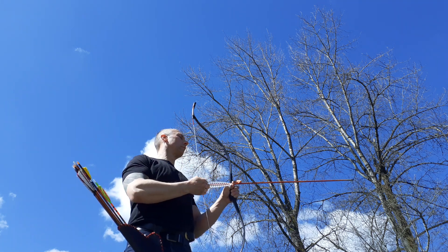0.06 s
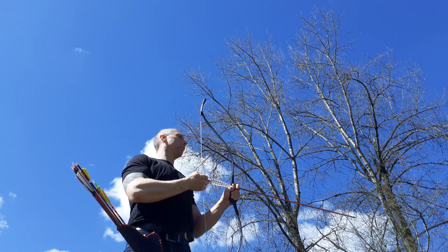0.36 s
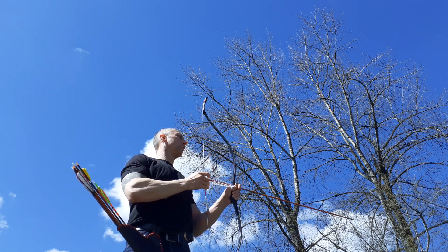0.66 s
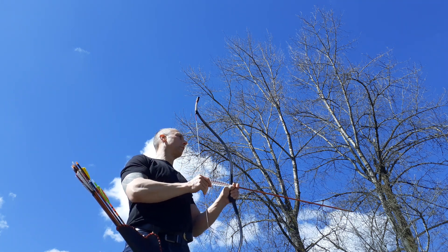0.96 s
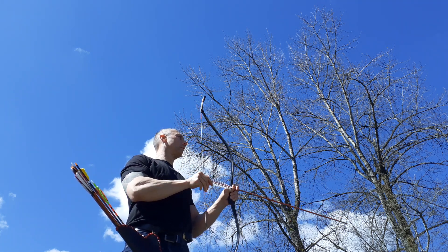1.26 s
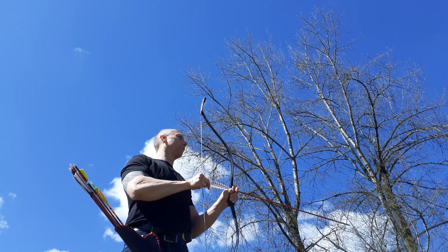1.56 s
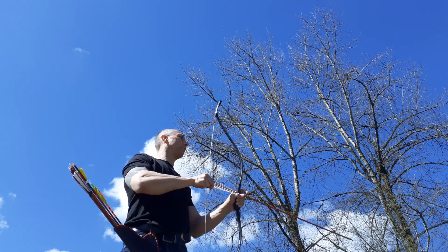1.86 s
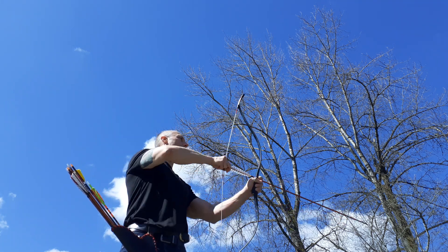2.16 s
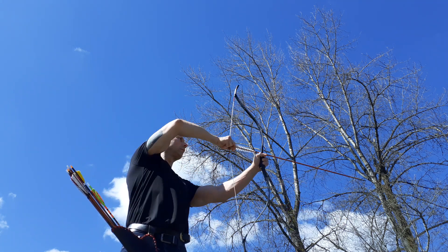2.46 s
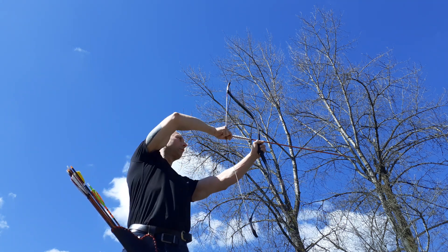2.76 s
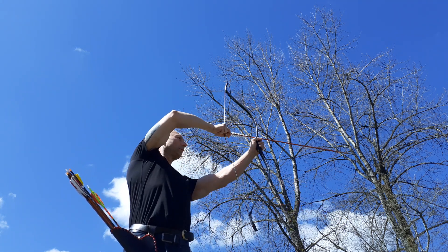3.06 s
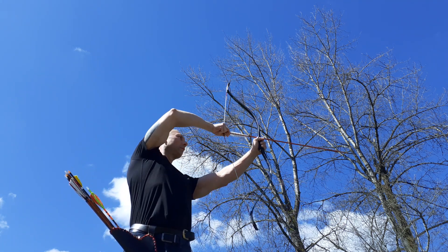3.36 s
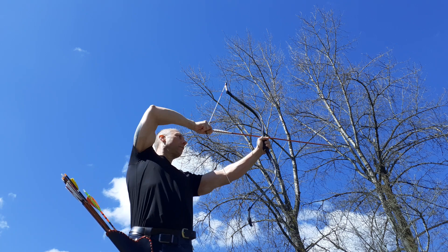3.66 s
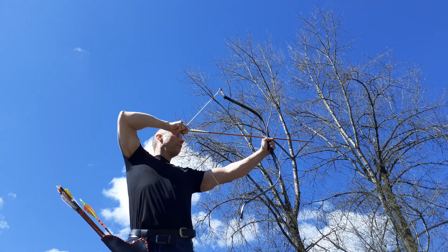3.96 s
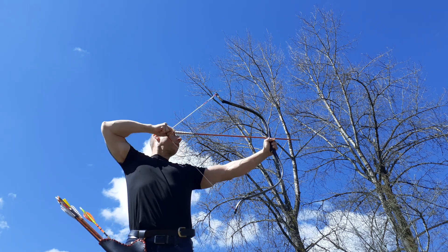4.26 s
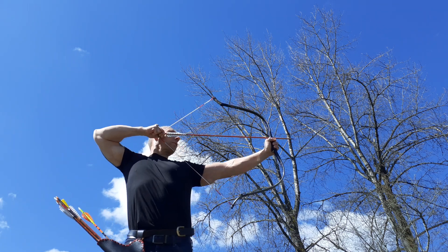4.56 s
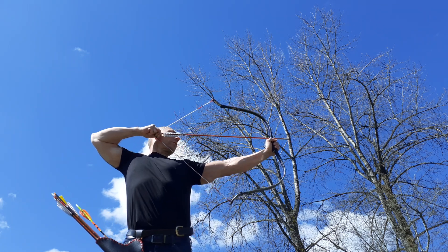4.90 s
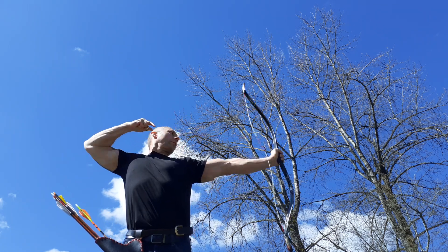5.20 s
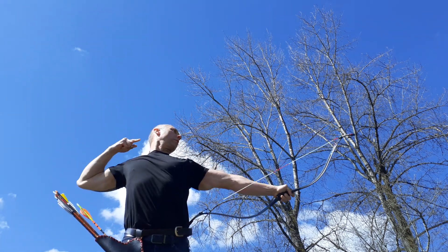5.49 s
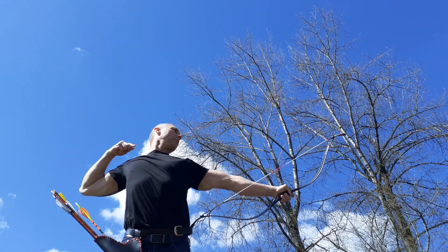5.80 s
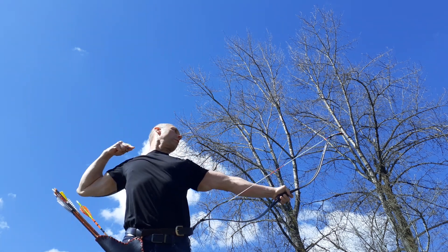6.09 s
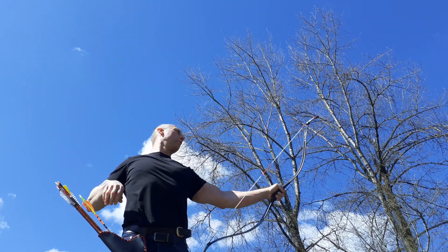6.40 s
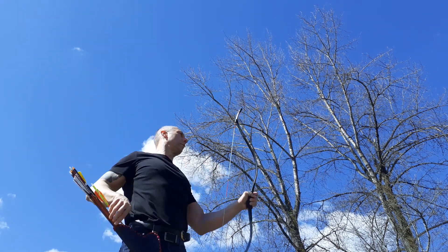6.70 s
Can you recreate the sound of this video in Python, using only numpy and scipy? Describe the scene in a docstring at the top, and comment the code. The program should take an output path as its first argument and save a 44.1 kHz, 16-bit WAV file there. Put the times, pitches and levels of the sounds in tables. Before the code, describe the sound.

A bow creaks as it is drawn, then fires with a sharp string snap over distant traffic rumble and a faint bird.

```python
"""Distant traffic rumbles, and a small bird whistles six notes over it. An archer nocks an arrow with light
clicks and draws his bow, which creaks by stick-slip friction. He shoots: the string slaps home and excites
the bow's modes, the shaft clatters past, and ground and trees scatter the snap. The arrow lands far off
with a tick, and feathers rub as his hand goes to the quiver. The traffic carries on throughout."""
import sys
import numpy as np
from scipy import signal
from scipy.fft import rfft, irfft, next_fast_len
from scipy.io import wavfile
from scipy.ndimage import map_coordinates

SR = 44100
rng = np.random.default_rng(int(sys.argv[2]) if len(sys.argv) > 2 else 0)


def unload_audio(sound):
    """Save the sound as a 16-bit wav file, at the path given as the first command line argument."""
    columns = np.transpose(np.atleast_2d(sound))
    # keep every value between -1 and 1, then stretch to whole-number steps
    steps = np.round(np.clip(columns, -1, 1) * 32767)
    wavfile.write(sys.argv[1], SR, steps.astype(np.int16))


N = 301644

# Friction spectrum of feathers. Each row: frequency in Hz, relative level in dB.
FEATHER_SPECTRUM = [(2000, -25), (4500, -11), (5800, 2.5), (7400, 5.5), (10500, -6), (13500, -3.5),
                    (16000, -17)]


def amp(db):
    """Amplitude ratio of a level in decibels."""
    return 10 ** (np.asarray(db) / 20)


def unit(x):
    """Normalisation to an rms of 1."""
    return x / np.sqrt(np.mean(x ** 2) + 1e-20)


def along(points, hz):
    """Interpolation of (Hz, value) points on a logarithmic frequency axis."""
    f, v = np.transpose(points)
    return np.interp(np.log(hz + 1), np.log(f + 1), v)


def curves(rows):
    """Linear interpolation in time: one value per sample for each column after the first."""
    s, *columns = np.transpose(rows)
    return [np.interp(np.arange(N) / SR, s, column) for column in columns]


def wobble(rate):
    """Smooth random modulation with `rate` knots a second."""
    knots = rng.standard_normal(int(N * rate / SR) + 4)
    return map_coordinates(knots, [np.arange(N) * rate / SR])


def arch(s, length):
    """A rounded envelope from 0 to 1 and back."""
    u = np.clip((np.arange(N) / SR - s) / length, 0, 1)
    return np.sqrt(np.abs(np.sin(np.pi * u)))


def filtered(x, response):
    """Linear filtering: the spectrum is multiplied by a complex frequency response."""
    n = x.shape[-1]
    m = next_fast_len(n + 8192)
    return irfft(rfft(x, m) * response(np.fft.rfftfreq(m, 1 / SR)), m)[..., :n]


def add(track, s, sound):
    """Superposition of a sound on a track from time s."""
    part = track[max(round(s * SR), 0):][:len(sound)]
    part += sound[:len(part)]


def panned(x, balance):
    """A level difference between left and right that depends on frequency."""
    return filtered(x, lambda hz: amp(np.outer([.5, -.5], along(balance, hz))))


def tilted(size, spectrum, tilt_db, pivot_hz):
    """Coloured noise of rms 1, tilted by tilt_db per octave above a pivot."""
    colour = lambda hz: amp(along(spectrum, hz) + tilt_db * np.log2(np.maximum(hz / pivot_hz, 1)))
    return unit(filtered(rng.standard_normal(size), colour))


def diffuse_noise(spectrum):
    """Partial coherence: left and right are alike in the bass and only weakly related in the treble."""
    # Each row: frequency in Hz, left-right correlation.
    coherence = [(60, 0.92), (150, 0.98), (300, 0.85), (640, .4), (1000, 0.028), (1400, -0.55),
                 (3000, 0.28), (7000, -0.13)]
    angle = lambda hz: np.arccos(np.clip(along(coherence, hz), -1, 1)) / 2
    response = lambda hz: amp(along(spectrum, hz)) * [np.cos(angle(hz)), np.sin(angle(hz))]
    mid, side = filtered(rng.standard_normal((2, N)), response)
    return unit(np.array([mid + side, mid - side]))


def engine_note(hz, waver, flutter_db):
    """A far engine's firing tone, modulated in frequency and amplitude on the way."""
    phase = 2 * np.pi * np.cumsum(hz * (1 + waver * wobble(14))) / SR
    return amp(flutter_db * wobble(9)) * unit(np.sin(phase))


def engines():
    """Pitch follows firing rate: one engine is heard throughout, others glide by briefly."""
    # An engine pulls, eases off and pulls again. Each row: time in seconds, pitch in Hz, relative dB.
    lasting_engine = [(.8, 192, -56), (1.3, 180, -48), (2.2, 207, -46.5), (2.8, 181, -40.5),
                      (3.6, 192, -48), (4.2, 185, -46), (5.1, 200, -42), (5.7, 210, -47), (6.84, 222, -46)]
    # Each row: start and length in seconds, first and last pitch in Hz, relative level in dB.
    brief_engines = [(-.3, .9, 114, 148, -41.5), (-.3, 1.3, 71, 77, -37.5), (-.1, 1.6, 335, 310, -50),
                     (.1, 1.35, 103, 106, -40.5), (1.6, .65, 69, 81, -40), (4.8, .5, 97, 99, -40.5),
                     (5.7, .7, 103, 105, -40), (5.9, 1.6, 160, 170, -42), (5.9, 1.1, 131, 142, -46)]
    hz, db = curves(lasting_engine)
    track = amp(db - 1.5) * engine_note(hz, waver=.012, flutter_db=2.5)
    for s, length, first_hz, last_hz, level_db in brief_engines:
        glide, = curves([(s, first_hz), (s + length, last_hz)])
        track += amp(level_db - 1) * arch(s, length) * engine_note(glide, waver=.009, flutter_db=1.5)
    return track


def traffic():
    """Incoherent sources add: a slowly receding rumble, tyre roar, faint hiss and engine tones."""
    # Each row: time in seconds, relative levels of tyre roar and of hiss in dB.
    levels = [(0, -49, -82.5), (.7, -48.7, -82.5), (2.7, -47, -79.3), (4.6, -47.5, -77.5),
              (5.4, -47.7, -76.5), (6.1, -48, -81), (6.84, -47.5, -77)]
    # Three noise spectra. Each row: frequency in Hz, relative spectral density in dB.
    rumble_spectrum = [(13, -58), (22, -35), (37, -27), (62, -9), (92, 1.5), (150, -6), (193, -7.5),
                       (258, -11), (319, -8), (374, -14), (520, -25), (680, -45), (1140, -120)]
    roar_spectrum = [(150, -37), (420, -4), (600, -1), (800, 0.5), (1120, 0.5), (1300, -8.5), (1700, -6.5),
                     (2500, -12), (3300, -25.5), (4200, -27.5), (5200, -42.5), (9000, -57)]
    hiss_spectrum = [(2000, -32), (4000, 1), (5400, -3), (6900, -0.5), (8500, -5), (10500, -11),
                     (16000, -9.5)]
    # Each row: frequency in Hz, left minus right in dB.
    balance = [(60, -2.5), (380, -2.5), (700, -1), (1100, 3.5), (1500, -1.5), (2400, -1.5), (3800, 1.5),
               (5000, -3), (15000, -2.5)]
    rumble_db, fade_db_per_s = -35.3, .25
    roar_db, hiss_db = curves(levels)
    t = np.arange(N) / SR
    rumble = amp(rumble_db - fade_db_per_s * t + .8 * wobble(7)) * diffuse_noise(rumble_spectrum)
    roar = amp(roar_db + 1.5 + .56 * wobble(5.4)) * diffuse_noise(roar_spectrum)
    hiss = amp(hiss_db + 4.5) * diffuse_noise(hiss_spectrum)
    return panned(rumble + roar + hiss + engines(), balance)


def bird(first_s, spacing_s, note_s, dip_hz, sweep_hz, waver_hz, count):
    """Frequency-modulated whistles: each dips and rises with a quaver, loudest just after the dip."""
    track, u = np.zeros(N), np.linspace(-1, 1, int(note_s * SR))
    swell = np.cos(np.pi * u / 2) * (1 + u / 2)
    for k in range(count):
        db = -65 + .7 * k + rng.normal(0, 1)  # the phrase grows a little louder
        quaver = unit(filtered(rng.standard_normal(len(u)), lambda f: f < 300))
        pitch = dip_hz + rng.normal(0, 35) + sweep_hz * np.sin(np.pi * u / 2) ** 2 + waver_hz * quaver
        note = amp(db) * swell * np.sin(2 * np.pi * np.cumsum(pitch) / SR)
        add(track, first_s + spacing_s * k - note_s / 2, note)
    return track


def scatter(x, decay, onset_s):
    """Diffuse scattering: an echo builds up, then each frequency dies at its own rate."""
    hz, t, noise = signal.stft(rng.standard_normal((2, SR)), SR, nperseg=256)
    envelope = amp(-60 * t / along(decay, hz)[:, None]) * (1 - np.exp(-(t / onset_s) ** 2))
    tail = signal.istft(noise * envelope, SR, nperseg=256)[1]
    return signal.fftconvolve(x[None], tail / np.linalg.norm(tail[0]), axes=1)[:, :N]


def rustle(grit_db):
    """Light friction: fingers and feathers brush the arrow in tiny uneven grains."""
    # Each row: start and length in seconds, level in dB, treble tilt in dB per octave.
    strokes = [(-.5, 2.6, -83, 16), (3.55, .55, -73.5, -14)]
    brush = sum(amp(db) * arch(s, length) * tilted(N, FEATHER_SPECTRUM, tilt_db, pivot_hz=5000)
                for s, length, db, tilt_db in strokes)
    return brush * unit(amp(grit_db * wobble(150)))


def scrapes(rows, spectrum, pivot_hz):
    """Sliding friction: bursts of noise that peak at half their nominal length and die away."""
    track, t = np.zeros(N), np.arange(SR // 3) / SR
    for s, db, length, tilt_db in rows:
        u = 2 * t / length
        add(track, s, amp(db) * u * np.exp(1 - u) * tilted(len(t), spectrum, tilt_db, pivot_hz))
    return track


def feather_rubs():
    """Grainy friction noise: feathers rub on hand and quiver, and swish through the air."""
    # Each row: start in seconds, level in dB, length in seconds, treble tilt in dB per octave.
    rubs = [(.008, -62.5, 0.021, 7), (.06, -72, .035, 6), (.3, -75.5, .03, -4), (.933, -63.5, 0.026, 4),
            (1.04, -72.5, .06, 6), (1.495, -72, 0.032, 3), (5.272, -56.5, 0.036, 9.5),
            (5.44, -68.5, 0.105, 10), (6.626, -59, .016, -3), (6.785, -68, 0.03, 1)]
    return scrapes(rubs, FEATHER_SPECTRUM, pivot_hz=5000) * unit(amp(2.5 * wobble(300)))


def ticks(rows, contacts, t60=.015, rise_s=.00017):
    """Impulse response of shaft or limb: each contact (delay in seconds, dB) cracks and briefly rings."""
    # Each row: frequency in Hz, relative level in dB.
    crack_spectrum = [(600, -24), (1500, 9), (4600, -3.5), (6500, -0.5), (10000, -12.5), (13000, -14),
                      (16000, -16)]
    track, t = np.zeros(N), np.arange(SR // 20) / SR
    envelope = amp(-60 * t / t60) * (1 - np.exp(-t / rise_s))
    for s, crack_db, hz, ring_db in rows:
        for delay, db in contacts:
            noise = filtered(rng.standard_normal(len(t)), lambda f: amp(along(crack_spectrum, f)))
            crack = amp(crack_db) * unit(noise)
            ring = amp(ring_db) * np.sin(2 * np.pi * hz * t)
            add(track, s + delay, amp(db) * (crack + ring) * envelope)
    return track


def arrow_clicks(bounce_s, bounce_db):
    """Elastic impact: the arrow clicks at the nock, the target and the quiver, bouncing once each time."""
    # Each row: start in seconds, crack level in dB, ring frequency in Hz, ring level in dB.
    impacts = [(1.162, -46.5, 6450, -62), (1.515, -49.5, 6800, -56), (1.529, -40, 1709, -35),
               (1.833, -56, 6970, -64), (5.6365, -42.5, 4250, -39), (6.7385, -43, 7700, -52)]
    return ticks(impacts, [(0, 0), (bounce_s, bounce_db)])


def bow_creaks(slip_s, side_db):
    """Stick-slip friction in the drawn bow: a weaker slip precedes and follows each main one."""
    # Each row: time of the main slip in seconds, crack level in dB, ring in Hz, ring level in dB.
    slips = [(3.5365, -46, 3480, -49), (3.6095, -43.5, 6250, -46), (3.6225, -48, 6500, -54),
             (3.7035, -43.5, 5700, -44), (3.7378, -42.5, 5820, -37.5)]
    return ticks(slips, [(-slip_s, side_db), (0, 0), (slip_s, side_db)])


def shaft_clatter():
    """Contact noise: shaft and vanes knock and slide past the bow, then the arrow enters the target."""
    # Each row: start in seconds, level in dB, length in seconds, treble tilt in dB per octave.
    knocks = [(5.2056, -21, .003, -1.5), (5.2083, -17.3, .0025, -1.2), (5.2146, -16.3, .0016, -3.5),
              (5.2218, -17.5, .0014, 11.5), (5.2252, -19, .003, 8), (5.2336, -21, 0.0009, 2)]
    slide, landing = (5.218, -26.5, .010, -.5), (5.6365, -47, .004, -14)
    # Each row: frequency in Hz, relative level in dB.
    shaft_spectrum = [(120, -47.5), (330, -5), (600, -0.5), (1200, -10), (2100, -2.5), (2750, -10.5),
                      (3400, 2), (4900, 1), (6300, 3.5), (8500, -2), (10300, -11.5), (12300, -3),
                      (14500, -6), (16500, -9)]
    return scrapes(knocks + [slide, landing], shaft_spectrum, pivot_hz=3520)


def contact_noise():
    """Radiation in one direction of all the clicking, creaking and scraping; each call draws new noise."""
    clicks = arrow_clicks(bounce_s=.006, bounce_db=-13)
    creaks = bow_creaks(slip_s=.0045, side_db=-5)
    return shaft_clatter() + feather_rubs() + rustle(grit_db=4) + clicks + creaks


def string_slap(low_hz, rise_cycles):
    """Modal excitation: each slap of the string rings the bow; a softer contact omits the high modes."""
    # Modes of bow and string. Each row: frequency in Hz, relative level in dB, t60 in seconds.
    bow_modes = [(316, -27, 0.29), (372, -26.5, 0.21), (415, -22, 0.13), (492, -19.5, .1),
                 (562.7, -24, 0.13), (614, -25, 0.098), (855, -21, 0.064), (1074, -3, .022),
                 (1740, -4, 0.011), (1954, -4.5, 0.0083)]
    # The string slams home. Each row: start in seconds, gain in dB, low-pass cutoff in Hz.
    slaps = [(5.2065, -3.5, 2597), (5.2096, -2, 1090)]
    # Three soft rebounds follow, each weaker than the last.
    gap_s, first_db, loss_db, soft_hz = .0166, -14, 4.5, 600
    rebounds = [(slaps[-1][0] + gap_s * (k + 1), first_db - loss_db * k, soft_hz) for k in range(3)]
    track, t = np.zeros(N), np.arange(SR // 2) / SR
    hz, db, t60 = np.transpose(bow_modes)[:, :, None]
    build_up = 1 - np.exp(-t * hz / rise_cycles)
    modes = amp(db - 60 * t / t60) * build_up * np.sin(2 * np.pi * hz * t)
    for s, blow_db, cutoff_hz in slaps + rebounds:
        ring = amp(rng.normal(0, .7, len(bow_modes))) @ modes
        contact = signal.butter(2, cutoff_hz, fs=SR, output="sos")
        add(track, s, amp(blow_db) * signal.sosfilt(contact, ring))
    # The slim bow radiates almost no bass.
    return signal.sosfilt(signal.butter(2, low_hz, "highpass", fs=SR, output="sos"), track)


def scene():
    """Direct and scattered sound add: the archer, a little to the right, his echoes, bird and traffic."""
    # Near scatter from the ground, far scatter from trees. Each row: frequency in Hz, t60 in seconds.
    ground_decay = [(300, 0.072), (1000, .16), (4000, .1), (15000, 0.063)]
    tree_decay = [(300, .7), (1500, 0.66), (6000, .5), (14000, 0.48)]
    # Each row: frequency in Hz, left minus right in dB.
    archer_balance = [(300, -1.5), (600, -1), (1050, 5.5), (1600, 4), (3500, -3.5), (6500, -6.5),
                      (10000, -8.5), (15000, -13.5)]
    left_lag_s = .000422  # only short waves reach the left side with a clear lag
    lag = lambda hz: np.exp(-1j * np.pi * np.outer([1, -1], np.maximum(hz * left_lag_s - 1, 0)))
    slap = string_slap(low_hz=214, rise_cycles=.56)
    coherent = filtered(slap + amp(-3.5) * contact_noise(), lag)
    incoherent = amp(-1) * np.array([contact_noise(), contact_noise()])
    outward = slap + contact_noise()
    ground_echo = amp(-14.5) * scatter(outward, ground_decay, onset_s=.0064)
    tree_echo = amp(-26) * scatter(outward, tree_decay, onset_s=.05)
    archer = panned(coherent + incoherent + ground_echo + tree_echo, archer_balance)
    song = bird(first_s=.557, spacing_s=.1415, note_s=.052, dip_hz=4130, sweep_hz=524, waver_hz=100,
                count=6)
    song_echo = amp(-11) * scatter(song, ground_decay, onset_s=.018)
    return archer + amp(-3.5) * song + song_echo + traffic()


def record(dry):
    """Band limiting: a steep low-pass removes the highest treble."""
    top_hz, edge_hz = 16000, 400
    return filtered(dry, lambda hz: np.clip((top_hz - hz) / edge_hz + .5, 0, 1))


dry = scene()
out = record(dry)
unload_audio(out)
```